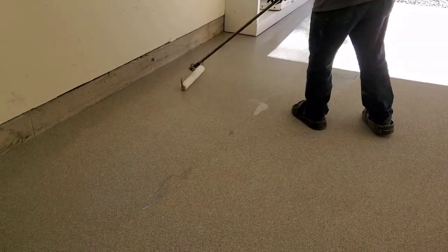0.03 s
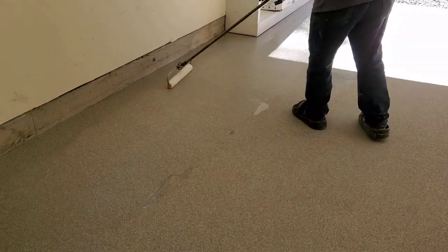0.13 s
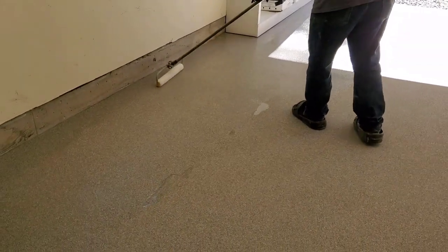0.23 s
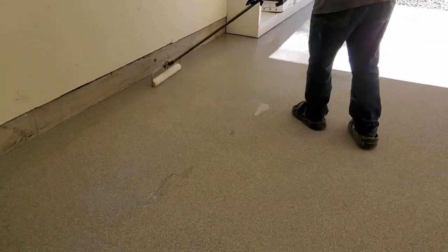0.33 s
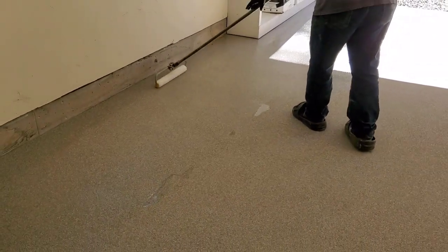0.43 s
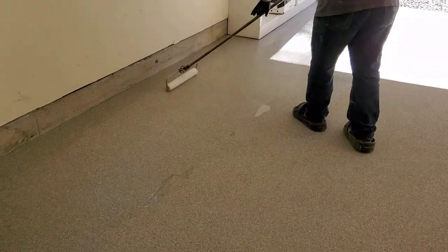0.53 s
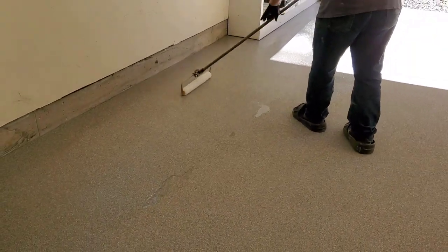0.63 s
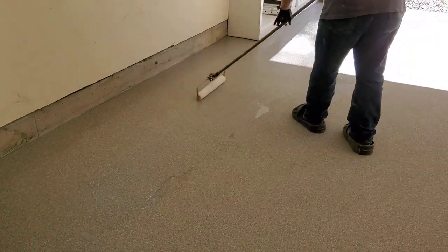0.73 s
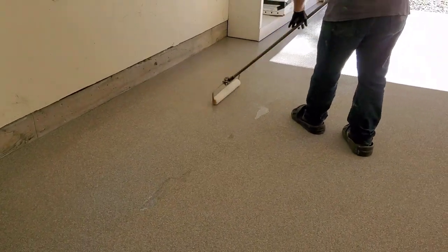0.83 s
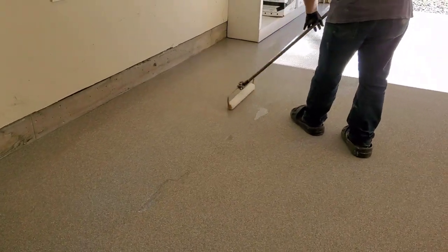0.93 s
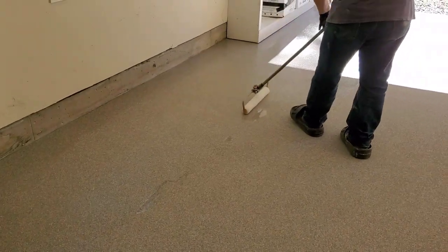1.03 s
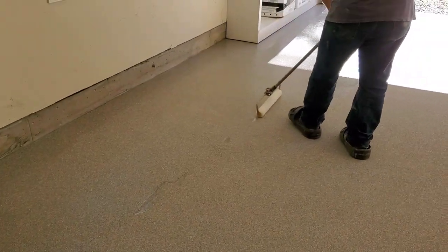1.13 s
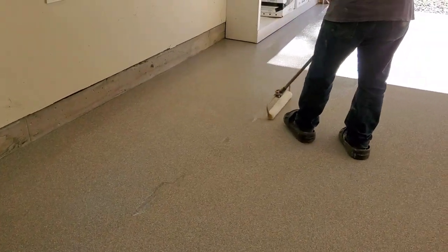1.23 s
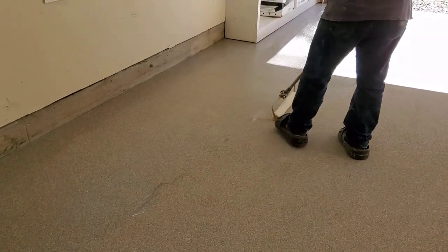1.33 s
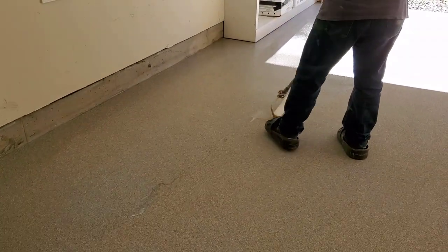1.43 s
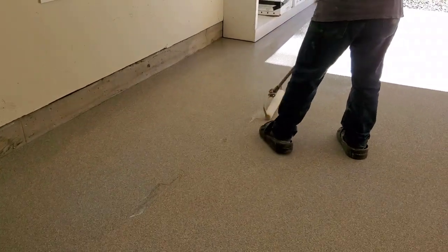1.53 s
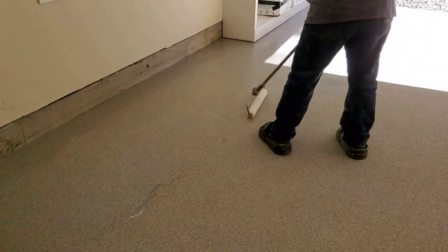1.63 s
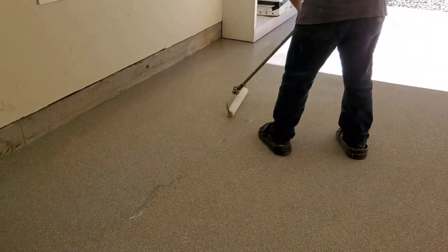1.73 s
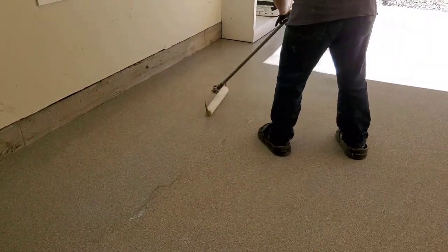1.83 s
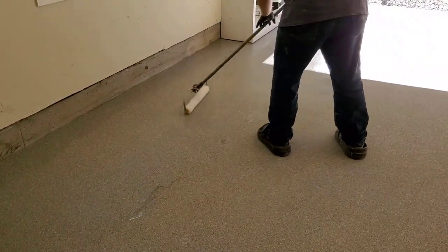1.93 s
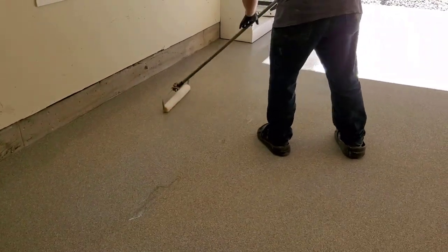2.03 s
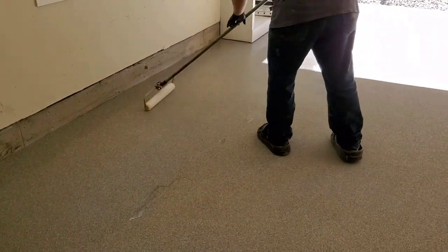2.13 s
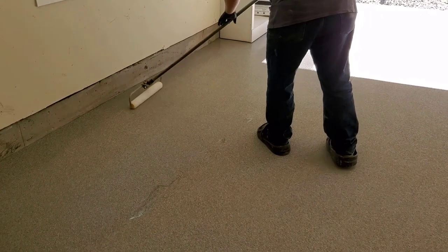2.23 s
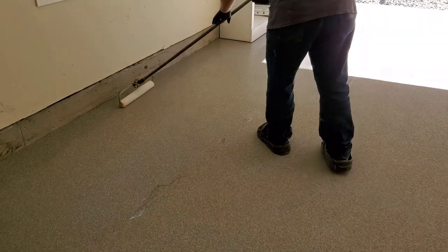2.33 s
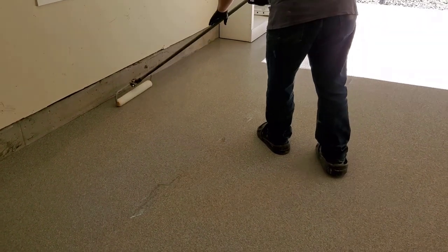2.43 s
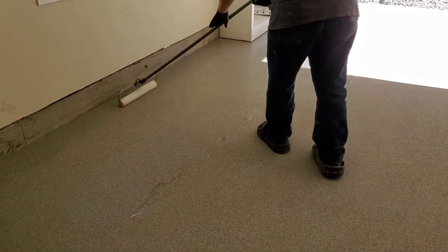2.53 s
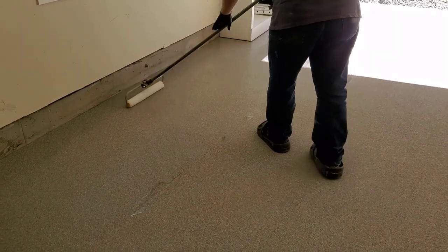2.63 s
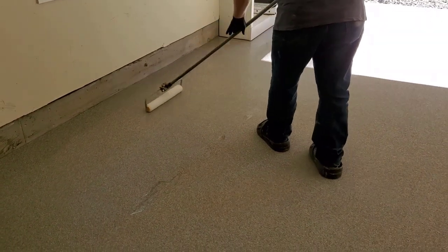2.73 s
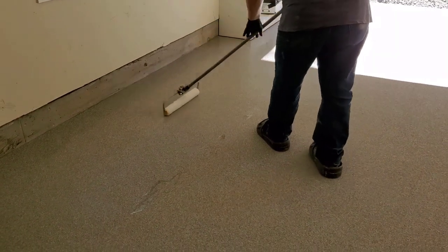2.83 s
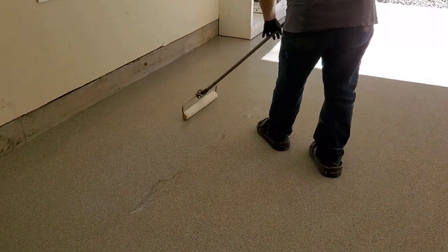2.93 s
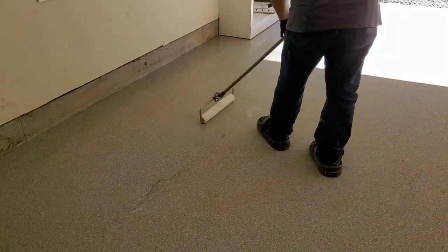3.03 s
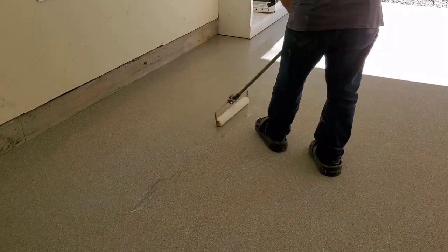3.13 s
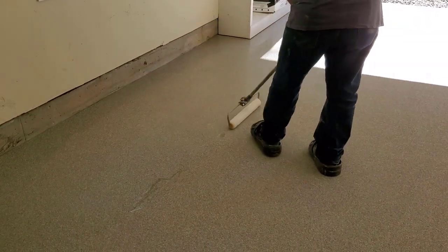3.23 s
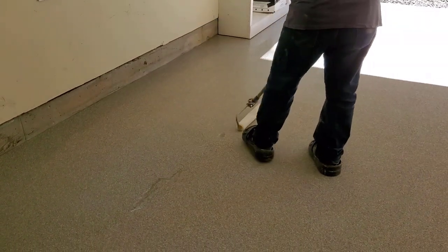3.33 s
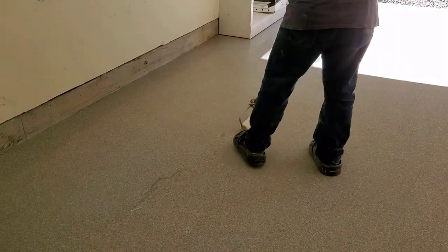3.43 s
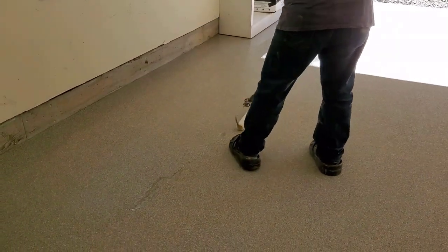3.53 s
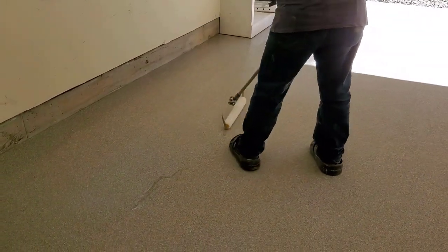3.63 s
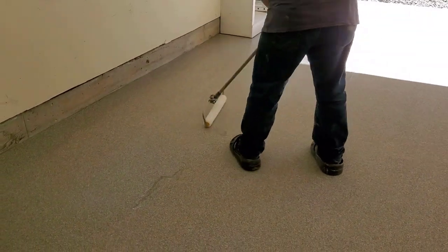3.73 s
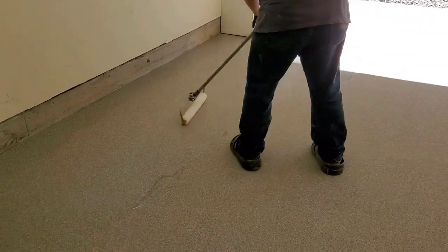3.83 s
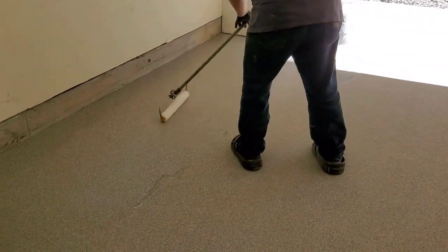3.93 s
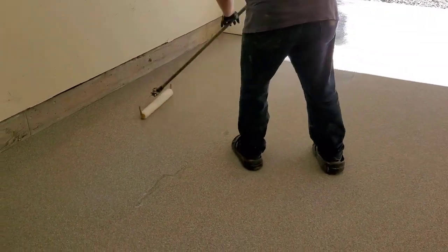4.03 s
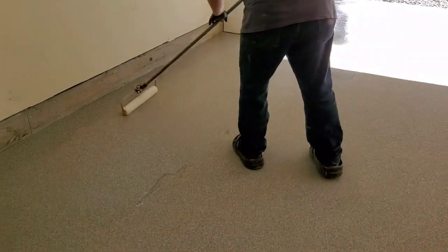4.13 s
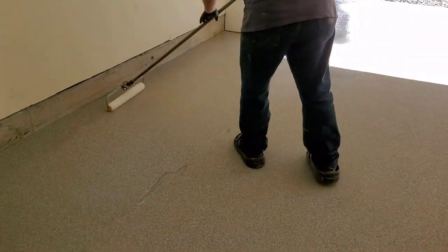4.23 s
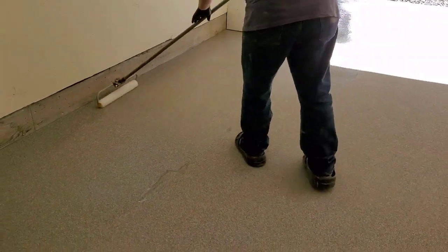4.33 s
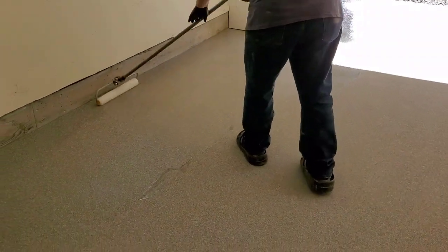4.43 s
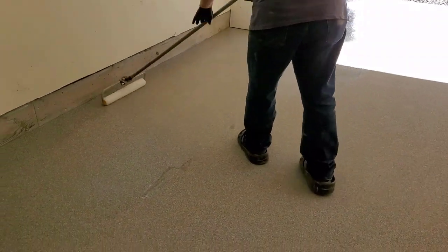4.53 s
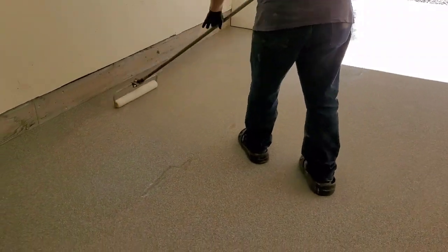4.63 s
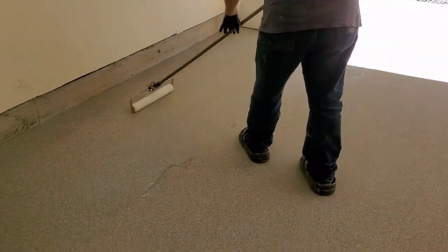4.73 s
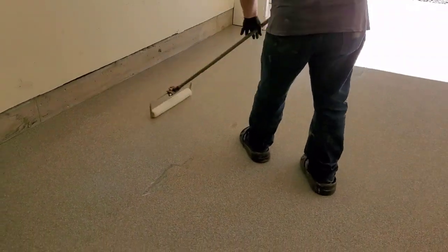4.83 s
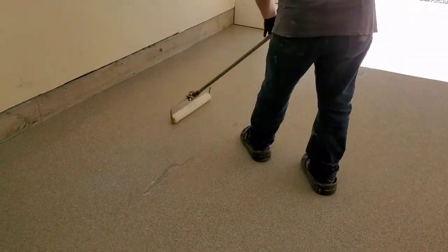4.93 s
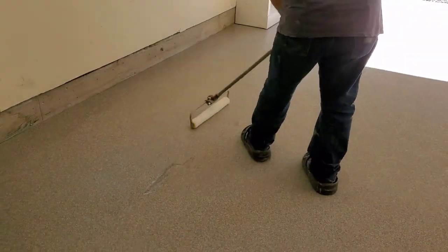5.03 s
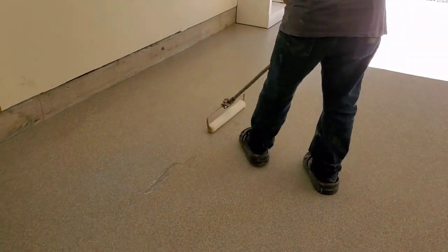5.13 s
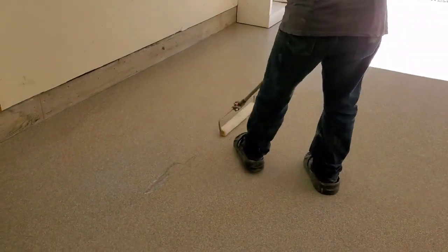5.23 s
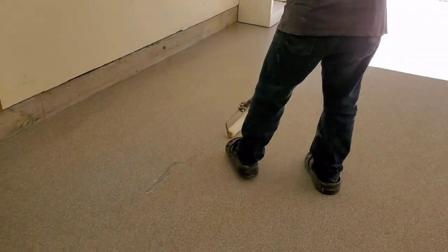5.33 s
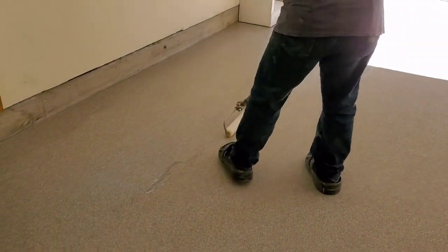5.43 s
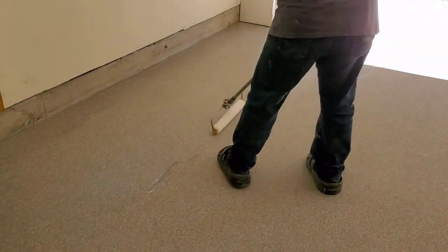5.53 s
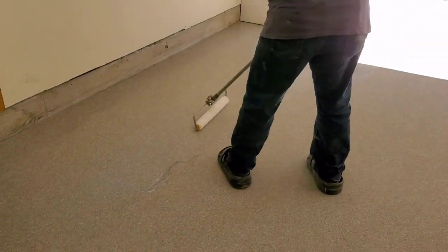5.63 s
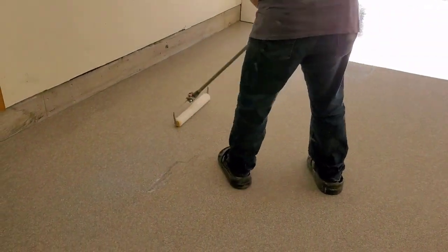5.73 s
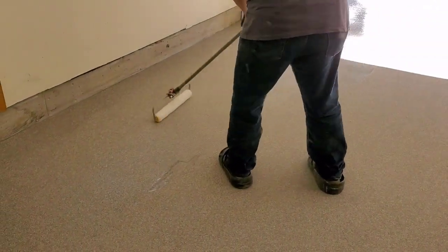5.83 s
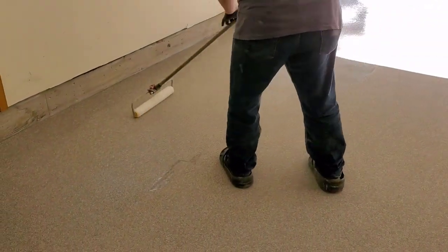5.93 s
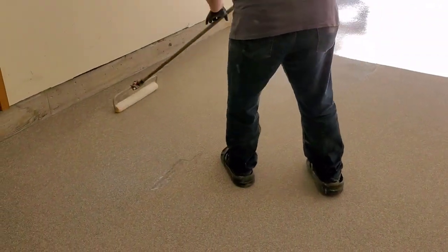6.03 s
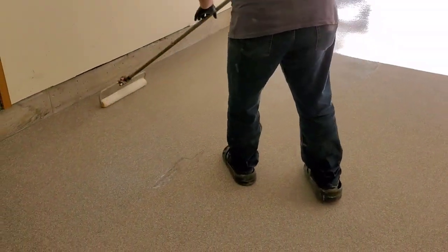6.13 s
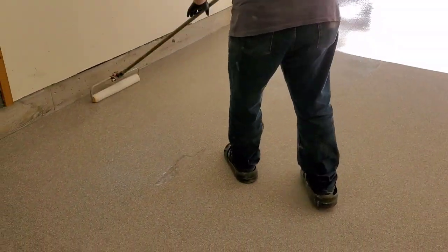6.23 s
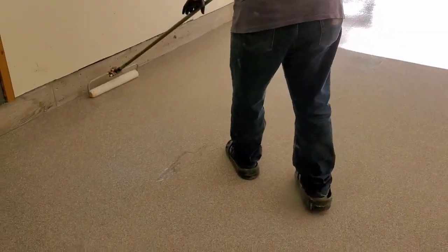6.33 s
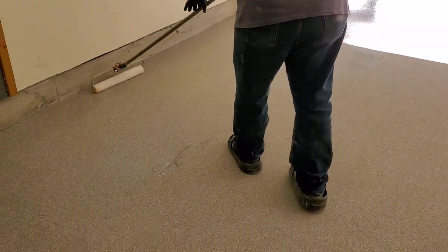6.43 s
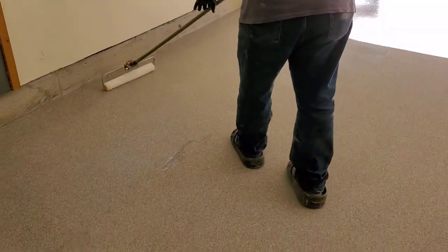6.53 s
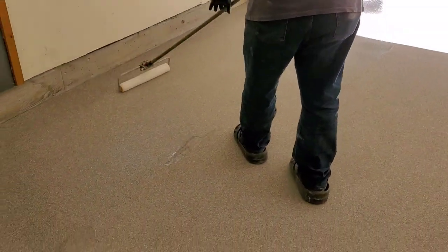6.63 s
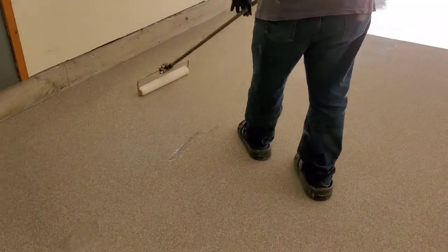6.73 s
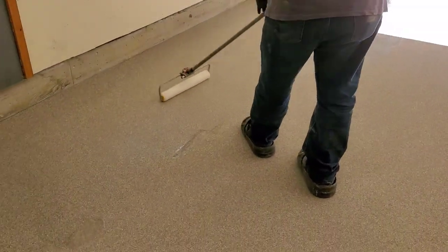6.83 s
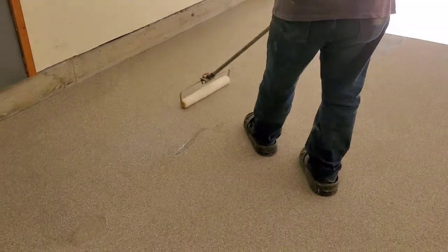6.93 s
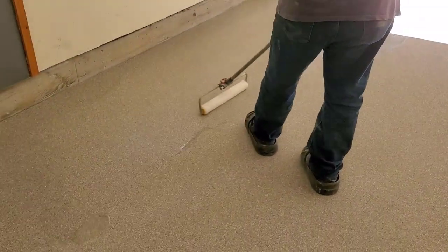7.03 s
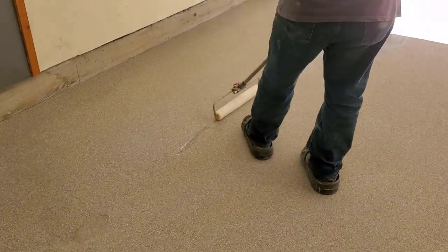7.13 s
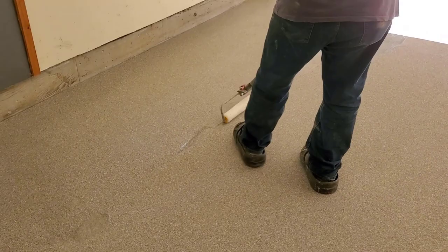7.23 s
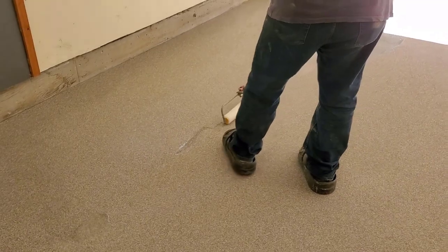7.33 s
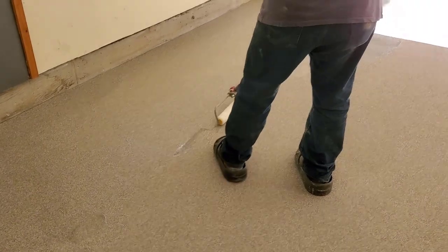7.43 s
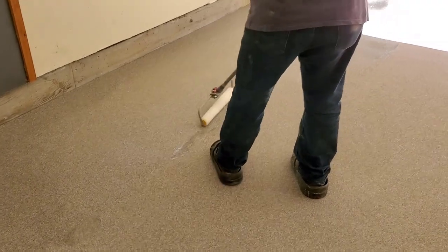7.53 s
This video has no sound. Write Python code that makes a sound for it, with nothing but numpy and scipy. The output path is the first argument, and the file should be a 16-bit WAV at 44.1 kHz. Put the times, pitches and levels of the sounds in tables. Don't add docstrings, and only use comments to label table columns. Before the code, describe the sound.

Close, tacky roller strokes swell and hush across a bare garage floor while something hollow knocks softly about once a second farther off.

```python
import sys
import numpy as np
from scipy import signal
from scipy.fft import rfft, irfft
from scipy.io import wavfile
from scipy.ndimage import uniform_filter1d

SR = 44100
rng = np.random.default_rng(int(sys.argv[2]) if len(sys.argv) > 2 else 0)


def gain_from_decibels(decibels):
    exponent = np.asarray(decibels, float) / 20
    return 10 ** exponent


def dump(signal):
    limited = np.clip(np.atleast_2d(signal).T, -1, 1)
    pcm = np.round(limited * 32767).astype(np.int16)
    wavfile.write(sys.argv[1], SR, pcm)


N = 335160

# pitch_hz, level_db (per Hz)
AIR_COLOUR = [(25, -11), (100, -4), (170, -9), (300, -1), (1000, -2), (3000, -9.5), (7000, -23.5),
              (10000, -36), (15500, -5)]
# pitch_hz, width_hz, level_db
MOTOR_HUM = [(99.6, 7, -78), (195.4, 9.5, -82)]
# centre_s, swell_db, half_length_s
BREEZES = [
    (4.62, 7, .15),
    (5.4, 5, .4),
    (6.12, 6, .08),
    (6.82, -9, .06),
    (7.14, 17, .16),
    (7.47, 8, .05),
]
# pitch_hz, t60_s
GARAGE_DECAY = [(100, 0.33), (400, 0.84), (1200, 0.42), (4000, 0.22), (12000, 0.068)]
# pitch_hz, likeness (-1 to 1)
PORT_LIKENESS = [(60, -0.0078), (99, 0.74), (160, 0.78), (270, 0.67), (450, -0.37), (740, -0.029),
                 (1220, -0.49), (2010, -0.09), (3330, -0.11), (5500, -0.11), (9080, 0.68), (15000, 0.78)]
# pitch_hz, left_minus_right_db
PORT_TILT = [(30, 1), (70, -5), (250, -0.2), (1000, -2.2), (2000, -0.1), (5000, 1.5), (15000, -1.5)]
# start_s, blow_db, mode_2_db, mode_3_db
HOLLOW_KNOCKS = [
    (0.547, -30, -29, -25),
    (1.489, -34, -25, -39),
    (2.413, -31, -29.5, -25.5),
    (3.355, -31, -33, -34),
    (4.313, -40, -27, -19),
    (5.256, -55, -22, 3),
    (6.219, -55, -11, 4.5),
    (7.142, -49, 1, -3),
]
# pitch_hz, ring_s
HOLLOW_MODES = [(400, 0.01), (780, 0.01), (1020, 0.013), (262, 0.01), (487, 0.0096)]
WEAK_MODES_DB = [-20, -13.5]
# delay_s, level_db
WALL_ECHOES = [(0.0157, -5), (.033, -5.5), (.046, -3.5), (0.0562, -7), (0.0681, -8), (0.086, -10),
               (.109, -17), (.1215, -14), (.15, -15), (0.1602, -15), (.1708, -16)]
# start_s, thump_db,
# thump_hz, cage_db, cage_hz
FRAME_CLACKS = [(.780, -41, 356, -48, 1100), (.790, -52, 190, -60, 900), (.865, -33.5, 404, -38.5, 990),
                (1.553, -38.5, 204, -42.5, 594), (1.556, -48, 330, -40.5, 1160),
                (2.655, -50.5, 221, -46, 970), (2.659, -41.5, 544, -42, 1470),
                (3.542, -43.5, 270, -28.5, 1070), (4.625, -44.5, 187, -39, 1030),
                (4.626, -42.5, 480, -34.5, 1840), (5.5, -40.5, 245, -36, 1230),
                (5.502, -45, 400, -43.5, 780), (6.566, -39, 250, -44, 950), (7.435, -43, 200, -34, 1900),
                (7.441, -33, 550, -33, 1150), (7.149, -62, 400, -49, 975)]
# pitch_hz, width_hz
CLACK_CLICK = (7800, 1400)
# start_s, level_db, pitch_hz, length_s
GRIT_SCRAPES = [
    (3.552, -33.5, 1200, 0.042),
    (3.58, -32, 1260, .035),
    (3.568, -37, 2300, 0.045),
    (4.035, -39, 1800, 0.11),
    (4.05, -38, 3360, 0.1),
    (5.784, -34.5, 2140, 0.033),
    (5.881, -26.5, 2190, 0.017),
    (7.44, -29.5, 1910, 0.029),
    (7.438, -32, 3000, .025),
    (7.452, -34.5, 1300, 0.028),
]
# start_s, level_db
SWIVEL_TICKS = [
    (5.884, -27),
    (7.3773, -28),
    (7.3797, -33),
    (7.4095, -34),
    (7.434, -32),
    (7.439, -27),
    (7.445, -29),
    (.8655, -36),
    (5.783, -32),
]
# turn_s, full_speed_s, slowing_s, full_speed_db, slowing_db
ROLLER_STROKES = [
    (-0.5, -0.17, 0.07, -46.9, -41.7),
    (0.44, 0.72, 0.79, -42.2, -43.3),
    (1.44, 2.02, 2.09, -43.6, -39.8),
    (2.52, 2.95, 3.1, -41.1, -45.2),
    (3.51, 3.63, 4.22, -45.7, -45.4),
    (4.51, 4.74, 5.08, -39.8, -43.5),
    (5.42, 5.85, 6.03, -46.8, -40.6),
    (6.44, 6.74, 6.84, -47.5, -43.1),
    (7.35, 7.72, 7.9, -44.3, -43.0),
    (8.3, 8.5, 8.7, -43.0, -43.0),
]
DRAG_SHARES = (.97, .9)
MIST_SHARES = (1.02, 1.2)
STROKE_MIST_DB = [.4, 1.2, .1, .1, 1.8, -.1, 2.9, 2.4, -1.3, .1]
# centre_s, tack_db, mist_db
FLOOR_SPOTS = [(0.1, -4.3, 1.4), (0.17, -1.4, 1.7), (0.62, -0.2, -4.4), (0.8, -0.7, 2.4), (1.14, 2.9, -0.5),
               (1.19, -1.7, -0.5), (1.31, 2.3, 4.7), (1.59, 1.8, 2.7), (2.08, -1.0, 3.4),
               (2.13, -1.4, -4.1), (2.22, -2.8, 2.7), (3.28, 0.9, -4.2), (3.63, -6.5, -0.8),
               (4.04, 1.0, 2.9), (4.25, 1.3, 2.3), (4.7, -0.1, -4.3), (4.74, -5.4, 1.6), (4.86, -1.9, 3.4),
               (5.03, 3.4, 0.4), (5.06, -4.0, -0.2), (5.58, 4.2, 2.9), (5.73, 2.9, -3.1), (5.86, 3.9, 0.9),
               (6.08, -4.5, 4.7), (6.59, 5.3, -2.9), (6.75, 5.6, -1.6), (6.94, 2.7, 4.8),
               (6.98, -1.9, -4.5), (7.13, 2.2, 3.0)]
# centre_s, swell_db, half_length_s
NAP_SKIDS = [(.49, -3.5, .04), (.58, 4.5, .04), (1.03, 2.5, .04), (1.58, 3, .04), (2.61, -4.5, .04),
             (3.61, 4.5, .06), (4.57, -4, .035), (5.3, 3.5, .05), (5.89, 3, .04), (6.31, 3, .04),
             (6.49, -4.5, .04), (7.39, 3, .03), (7.465, 9, .04)]
# pitch_hz, level_db (per Hz)
PEEL_COLOUR = [(100, -61), (200, -15), (400, -11.5), (640, -10.5), (1140, -2.5), (1900, -1), (2800, -2.5),
               (3800, -5), (5800, -1.5), (7800, -3.5), (9800, -4), (12200, 6), (15500, 4.5)]


def evened(x):
    return x / np.sqrt(np.mean(x ** 2) + 1e-20)


def read(points, hz):
    f, value = np.transpose(points)
    return np.interp(np.log(hz + 1), np.log(f + 1), value)


def slow(top_hz):
    t = np.arange(0, N + 128, 128) / SR
    waves = 0
    for f in np.geomspace(top_hz / 8, top_hz, 24):
        waves = waves + np.sin(2 * np.pi * (f * t + rng.random())) / np.sqrt(f)
    return np.interp(np.arange(N) / SR, t, evened(waves))


def bumps(rows):
    t = np.arange(0, N + 128, 128) / SR
    swells = sum(db * np.exp(-((t - s) / half) ** 2) for s, db, half in rows)
    return np.interp(np.arange(N) / SR, t, swells)


def resonate(x, hz, width):
    pole = np.exp((2j * hz - width) * np.pi / SR)
    return 2 * signal.lfilter([1 - abs(pole)], [1, -pole], x).real


def ports(pair):
    size = pair.shape[1]
    hz = np.fft.rfftfreq(size, 1 / SR)
    a, b = rfft(pair)
    half = np.arccos(np.clip(read(PORT_LIKENESS, hz), -1, 1)) / 2
    mid, side = np.cos(half) * a, np.sin(half) * b
    lean = gain_from_decibels(read(PORT_TILT, hz) / 2)
    return irfft(np.array([(mid + side) * lean, (mid - side) / lean]), size)


def garage(x, live):
    hz, t, z = signal.stft(rng.standard_normal((2, SR)), SR, nperseg=256)
    decay = gain_from_decibels(-60 * t / (live * read(GARAGE_DECAY, hz)[:, None]))
    tail = signal.istft(z * decay, SR, nperseg=256)[1]
    build_up = np.clip(np.arange(tail.shape[1]) / SR / 0.0091, 0, 1)
    tail = ports(tail * build_up)
    return signal.fftconvolve(x[None], tail / np.linalg.norm(tail[0]), axes=1)[:, :N]


def background():
    hz = np.fft.rfftfreq(N, 1 / SR)
    air = evened(irfft(rfft(ports(rng.standard_normal((2, N)))) * gain_from_decibels(read(AIR_COLOUR, hz)), N))
    low_pass = (hz > 15) / (1 + (hz / 70) ** 3)
    low = irfft(rfft(ports(rng.standard_normal((2, N)))) * low_pass, N)
    rumble = evened(low) * gain_from_decibels(-80 + bumps(BREEZES) + 2.2 * slow(top_hz=4.))
    hum = sum(gain_from_decibels(db) * evened(resonate(rng.standard_normal(N), f, width)) for f, width, db in MOTOR_HUM)
    return gain_from_decibels(-56.5) * air + rumble + hum


def wall_repeats():
    lead = 0.0015
    walls = np.zeros((2, SR // 4))
    walls[:, 0] = 1
    for k, (delay, db) in enumerate(WALL_ECHOES):
        side = (-1) ** k * np.array([1, -1])
        arrival = np.round(delay * SR * (1 + lead * side)).astype(int) + 15
        walls[[0, 1], arrival] = gain_from_decibels(db)
    return walls


def knocks():
    out, t = np.zeros((2, N + SR)), np.arange(4000) / SR
    lag = np.array([[-.5], [.5]]) * 1.15
    for s, blow_db, *upper_db in HOLLOW_KNOCKS:
        here = out[:, round(s * SR) - 260:][:, :len(t)]
        for (hz, ring_s), db in zip(HOLLOW_MODES, [0, *upper_db, *WEAK_MODES_DB]):
            swell = (t / ring_s) ** 2 * np.exp(-2 * (t / ring_s) ** 1.22) * 6.1
            wave = np.sin(2 * np.pi * hz * rng.uniform(0.95, 1.015) * t + lag)
            here += gain_from_decibels(blow_db + db + 5.2) * swell * wave
    repeated = signal.fftconvolve(out, wall_repeats(), axes=1)[:, :N]
    late = np.roll(out[0], 1500)[:N]
    return repeated + gain_from_decibels(-12.5) * garage(late, live=1.04)


def rattle(length, first):
    t = np.arange(8000) / SR
    ticks = rng.standard_normal(len(t)) * (rng.random(len(t)) < .06) * np.exp(-t / max(length, .001))
    ticks[0] = first
    return ticks


def ring(ticks, hz, width, db):
    bright = signal.lfilter([1, -1], [1, -np.exp(-np.pi * hz / SR)], ticks)
    part = resonate(resonate(bright, hz, width), hz, width)
    return gain_from_decibels(db) * part / abs(part).max()


def clacks():
    dry, near = np.zeros((2, N + SR))
    for s, thump_db, thump_hz, cage_db, cage_hz in FRAME_CLACKS:
        ticks = rattle(0.011, first=3.0)
        click = ring(ticks, *CLACK_CLICK, cage_db - 12.5)
        thump = ring(ticks, thump_hz, 1.3 * thump_hz, thump_db)
        cage = ring(ticks, cage_hz, 0.41 * cage_hz, cage_db)
        dry[round(s * SR) - 40:][:len(ticks)] += click + thump + cage
    for s, db, hz, length in GRIT_SCRAPES:
        width = min(0.53, 0.022 / length) * hz
        dry[round(s * SR):][:8000] += ring(rattle(length, first=2.2), hz, width, db)
    for s, db in SWIVEL_TICKS:
        near[round(s * SR):][:8000] += ring(rattle(0.002, first=3.2), 2800, 7500, db)
    dry, near = dry[:N], near[:N]
    return dry + near + garage(gain_from_decibels(-3.5) * dry + gain_from_decibels(-14) * near, live=0.45)


def stroke():
    t = np.arange(N) / SR
    turn, full, slowing, full_db, slowing_db = np.transpose(ROLLER_STROKES)
    phase = np.interp(t, np.ravel([turn, full, slowing], "F"), np.tile([0, 1, 1], len(turn)))
    rising = np.searchsorted(turn, t) > np.searchsorted(full, t)
    speed = np.sin(np.pi / 2 * phase) ** np.where(rising, 1.51, 1.63)
    creep = .178
    speed_db = 26 * np.log10(creep + (1 - creep) * speed)
    hold_s = np.ravel([full, slowing], "F")
    load_db = np.interp(t, hold_s, np.ravel([full_db, slowing_db], "F"))
    spray_db = np.interp(t, hold_s, np.repeat(STROKE_MIST_DB, 2))
    spot_s = .069
    tack_db = load_db + speed_db + bumps((s, db, spot_s) for s, db, _ in FLOOR_SPOTS)
    drag_db = -4.6 + bumps(NAP_SKIDS) + (np.where(rising, *DRAG_SHARES) - 1) * speed_db
    mist_db = spray_db + bumps((s, db, spot_s) for s, _, db in FLOOR_SPOTS)
    mist_db = mist_db + (np.where(rising, *MIST_SHARES) - 1) * speed_db
    return tack_db, drag_db, mist_db


def snaps(per_s, spread_db, blur_s, wet_db):
    size = gain_from_decibels(spread_db * np.minimum(rng.exponential(1, N), 5)) * (rng.random(N) < per_s / SR)
    keep = np.exp(-2 * np.log(1000) / (blur_s * SR))
    blur = np.sqrt(signal.lfilter([1 - keep], [1, -keep], size ** 2))
    wet = gain_from_decibels(wet_db) * blur * rng.standard_normal((2, N))
    return wet + size * rng.choice([-1., 1.], (2, N))


def patchy(x, depth_db, width, length):
    z = signal.stft(x, nperseg=512)[2]
    field = uniform_filter1d(rng.standard_normal(z.shape[1:]), width, 0)
    field = uniform_filter1d(field, length, 1)
    return signal.istft(z * gain_from_decibels(depth_db * evened(field)), nperseg=512)[1][:, :N]


def roller():
    tack_db, drag_db, mist_db = stroke()
    hz = np.fft.rfftfreq(N, 1 / SR)
    low = 1 / (1 + (hz / 3620) ** 8)
    high = 1 / (1 + (9110 / (hz + 1)) ** 12)
    middle = abs(1 - low - high)
    lumps_db = 0.5 * slow(top_hz=14.)
    drag_db = drag_db + 0.66 * slow(top_hz=22.07)
    mist_db = mist_db + 1.1 * slow(top_hz=14.)
    layers = ((low, drag_db, snaps(5000., 3.25, 0.069, 8.2)),
              (middle, .6, snaps(9000., 3.4, 0.052, 6.6)),
              (high, mist_db, snaps(12000., 2.2, .04, 3.)))
    out = 0
    for share, db, grains in layers:
        band = irfft(rfft(ports(grains)) * np.sqrt(share) * gain_from_decibels(read(PEEL_COLOUR, hz)), N)
        out = out + evened(band) * gain_from_decibels(tack_db + db + lumps_db + 3.0)
    return patchy(out, depth_db=1.52, width=5, length=6)


def scene():
    return background() + knocks() + clacks() + roller()


def blink(x, share, above_hz, band_hz):
    hz, t, z = signal.stft(x, SR, window="cosine", nperseg=2048)
    lost = rng.random((40, len(t))) < share
    lost |= np.roll(lost, 1, 1) & (rng.random(lost.shape) < .6)
    band = np.minimum(hz // band_hz, 39).astype(int)
    keep = ~lost[band] | (hz < above_hz)[:, None]
    return signal.istft(z * keep, SR, window="cosine", nperseg=2048)[1][:, :N]


def top_cut(x):
    return signal.sosfilt(signal.butter(12, 16890, fs=SR, output="sos"), x)


def record(dry):
    edge = signal.firwin(2047, 15740, window=("kaiser", 11), fs=SR)
    limited = signal.oaconvolve(dry, edge[None], "same")
    finished = blink(limited, share=.03, above_hz=7580, band_hz=689)
    return top_cut(finished)


dry = scene()
out = record(dry)
dump(out)
```